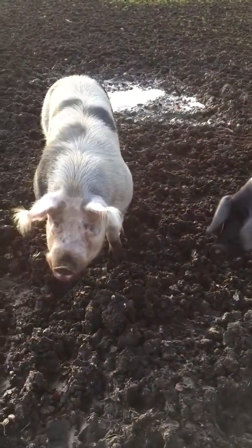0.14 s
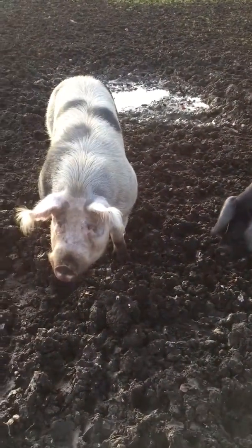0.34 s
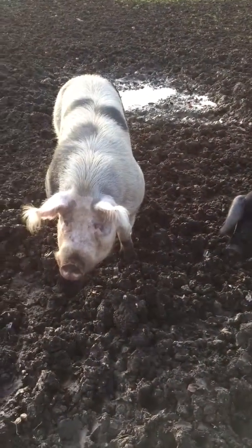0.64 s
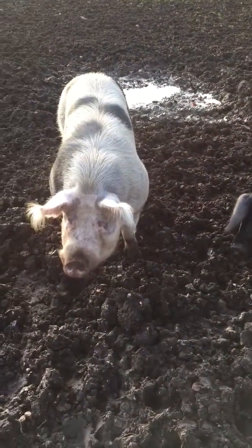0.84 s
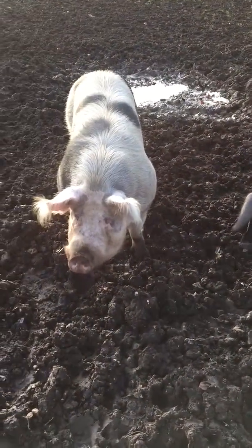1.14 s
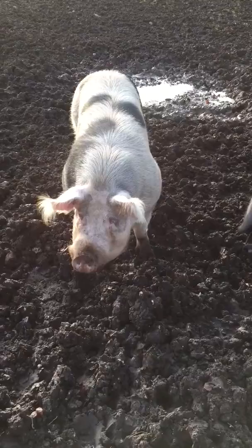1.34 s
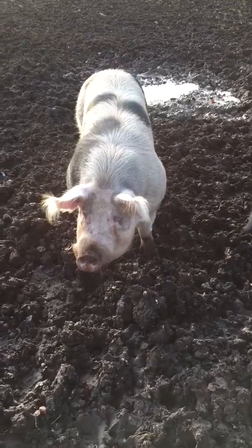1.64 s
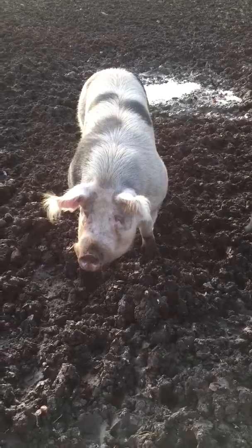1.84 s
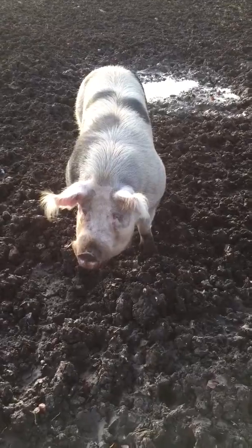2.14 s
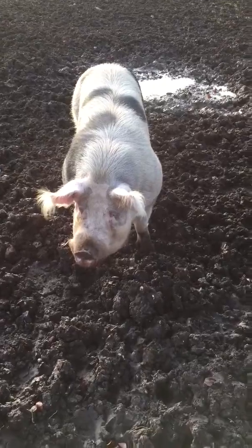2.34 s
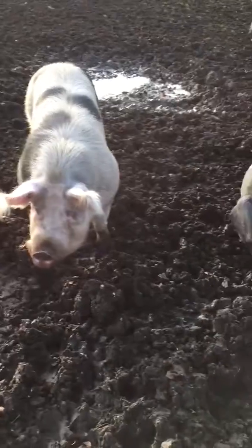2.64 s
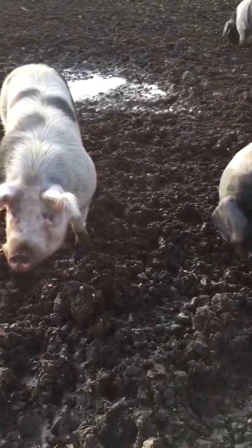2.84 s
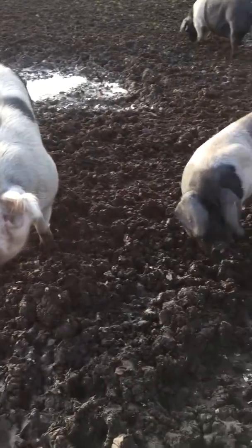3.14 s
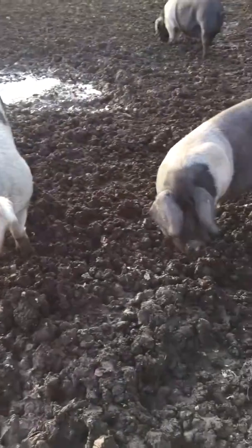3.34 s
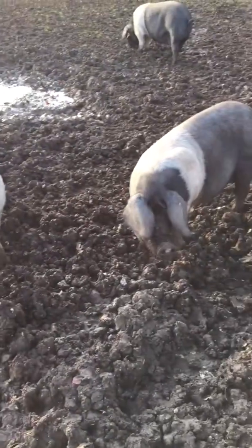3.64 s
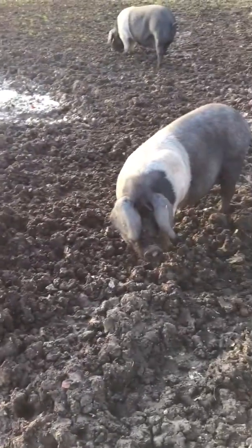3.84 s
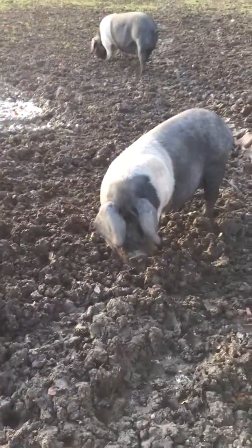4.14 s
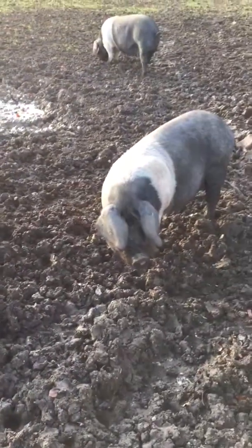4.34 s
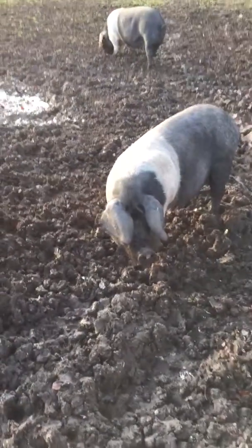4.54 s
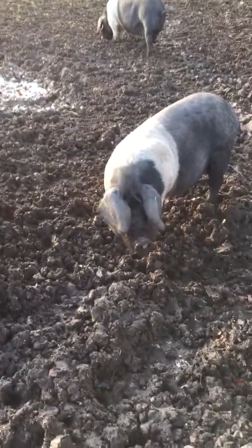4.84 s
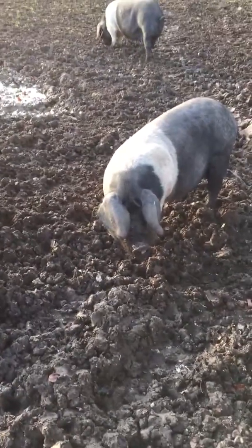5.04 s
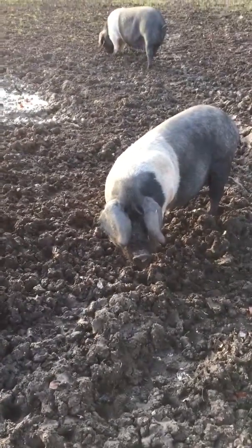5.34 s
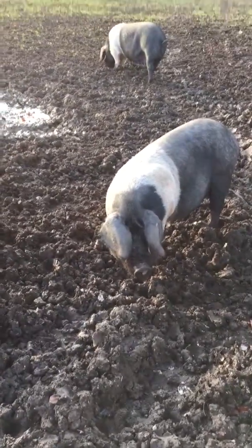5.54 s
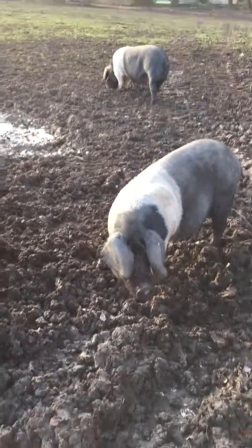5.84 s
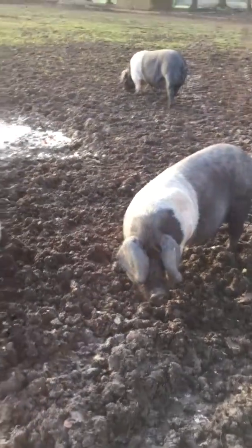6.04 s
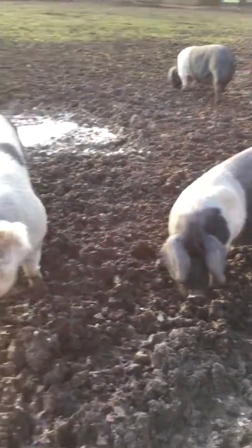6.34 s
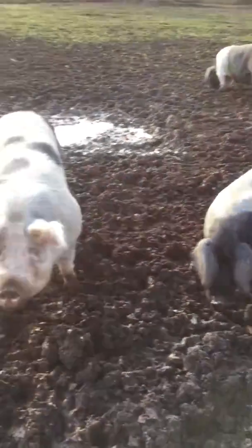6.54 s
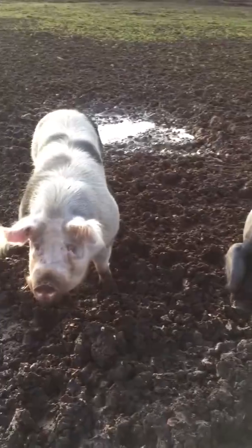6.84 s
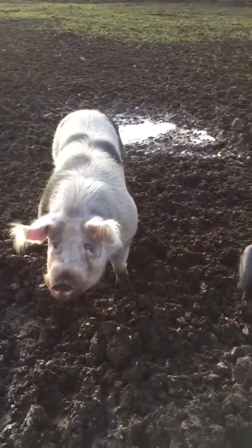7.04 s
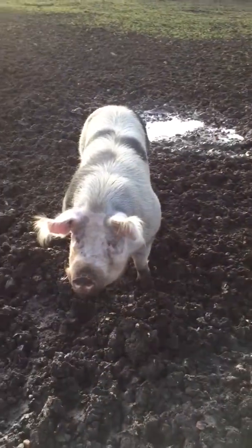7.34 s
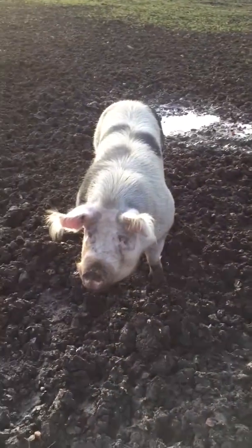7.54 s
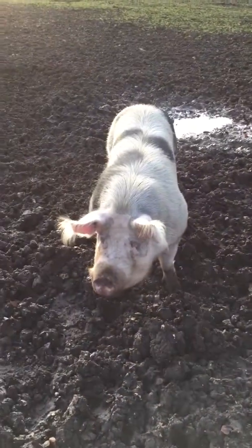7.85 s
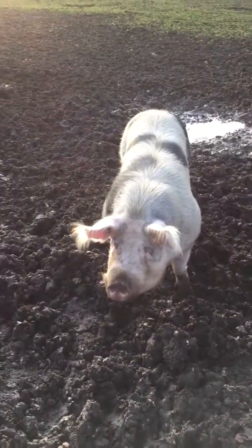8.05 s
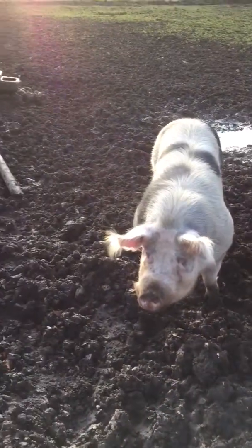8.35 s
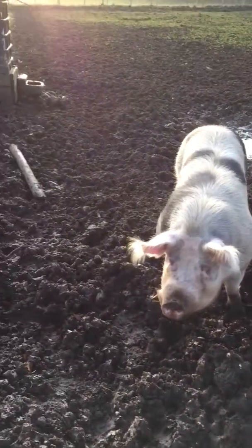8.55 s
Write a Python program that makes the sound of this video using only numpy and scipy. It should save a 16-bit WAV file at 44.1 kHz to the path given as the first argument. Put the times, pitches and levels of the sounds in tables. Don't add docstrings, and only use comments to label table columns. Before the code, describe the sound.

Pigs close by in a muddy paddock give fluttering, throaty grunts and sniffs, ending in gulps and a wet jaw smack over distant traffic.

```python
import sys
import numpy as np
from scipy import signal
from scipy.io import wavfile
from scipy.ndimage import uniform_filter1d

SR = 44100
rng = np.random.default_rng(int(sys.argv[2]) if len(sys.argv) > 2 else 0)


def pcm_store(signal):
    levels = np.round(np.clip(np.atleast_2d(signal), -1, 1) * 32767)
    wavfile.write(sys.argv[1], SR, levels.astype(np.int16).T)


def field_ratio(decibels):
    return 10 ** (np.asarray(decibels, dtype=float) / 20)


N = 384066


def rms_one(x):
    return x / np.sqrt(np.mean(x ** 2) + 1e-20)


def add(out, start_s, x):
    i = int(round(start_s * SR))
    out[i:i + len(x)] += x[:N - i]


def swell(start_s, length_s):
    return np.sin(np.pi * np.clip((np.arange(N) / SR - start_s) / length_s, 0, 1))


def eased(s, start_s, length_s):
    return np.sin(np.pi / 2 * np.clip((s - start_s) / length_s, 0, 1)) ** 2


def in_time(tables, rest=-120):
    t = np.arange(N) / SR
    columns = [[np.interp(t, r[:, 0], c, rest, rest) for c in r.T[1:]] for r in map(np.array, tables)]
    return np.max(columns, axis=0)


def drift(rate):
    knots = rng.standard_normal(int(N / SR * 40) + 2)
    return np.interp(np.arange(N) / SR * np.clip(rate, .1, 39), np.arange(len(knots)), knots)


def ring(seconds, modes):
    t = np.arange(int(seconds * SR)) / SR
    out = 0
    for k, (hz, width, db) in enumerate(modes):
        fade = np.exp(-np.pi * width * t)
        out = out + (-1) ** k * field_ratio(db) * fade * np.sin(2 * np.pi * hz * t)
    return out


def noise_through(response):
    return signal.fftconvolve(rng.standard_normal(N), response)[:N]


def coloured(spectrum, patchy_db):
    hz, db = np.transpose(spectrum)
    bands = int(3.3 * np.log2(hz[-1] / hz[0]))
    edges = np.geomspace(hz[0], min(hz[-1], .45 * SR), bands + 1)
    out, white = 0, rng.standard_normal((2, N))
    for k, (low, high) in enumerate(zip(edges, edges[1:])):
        band = signal.sosfilt(signal.butter(2, [low, high], "band", fs=SR, output="sos"), white[k % 2])
        level_db = np.interp(np.log(low * high) / 2, np.log(hz), db)
        out = out + band * field_ratio(level_db + patchy_db * drift(14))
    return rms_one(out)


def gliding_tone(length_s, from_hz, to_hz, soft_share):
    hz = np.linspace(from_hz, to_hz, int(length_s * SR))
    return np.sin(2 * np.pi * np.cumsum(hz) / SR) * signal.windows.tukey(len(hz), soft_share)


def soft_note(pitch_hz, t60_s):
    return np.convolve(ring(0.14, [(pitch_hz, 2.3 / t60_s, 0)]), np.hanning(40) / 20)


# pitch_hz [Hz], level_db [dB]
RUMBLE = [(18, -68), (30, -32), (67, -7.5), (81, 2.5), (97, 1.5), (114, -7), (162, -4.5), (212, -15),
          (282, -18.5), (420, -37), (550, -24), (920, -120)]
# pitch_hz [Hz], level_db [dB]
ROAR = [(180, -45), (300, -18), (411, -26.5), (854, 4), (1080, 2), (1630, -17), (2920, -27), (3280, -28.5),
        (3560, -20), (3810, -29), (9650, -35), (15900, -38.5)]
# start_s [s], length_s [s], engine_db, tyres_db [dB over the steady road]
PASSES = [
    (-0.5, 2.7, 0.5, 2.5),
    (3.5, 2.7, 5, 3.5),
    (5.0, 3, 1, 1.5),
    (7.5, 1.12, 3.5, 6),
    (7.5, 0.77, -3, 0),
]
# start_s [s], length_s [s], level_db [dB]
NEAR_CAR = (7.45, 0.8, -57.5)
# pitch_hz [Hz], width_hz [Hz], level_db [dB]
SPRAY = [(1380, 360, 0)]
RUMBLE_DB, ROAR_DB, DRONE_DB = -54.5, -57.5, -66.5
LORRY_S, LORRY_RISE_S, LORRY_DB = 7.4, 0.92, 17


def road():
    engine_db = sum(swell(start_s, length_s) ** 2 * engine for start_s, length_s, engine, _ in PASSES)
    tyres_db = sum(swell(start_s, length_s) ** 2 * tyres for start_s, length_s, _, tyres in PASSES)
    rumble = field_ratio(RUMBLE_DB + engine_db) * coloured(RUMBLE, patchy_db=4.5)
    roar = field_ratio(ROAR_DB + tyres_db) * coloured(ROAR, patchy_db=.5)
    hum = ring(.04, [(52, 70, 0)])
    drone_db = DRONE_DB + LORRY_DB * eased(np.arange(N) / SR, LORRY_S, LORRY_RISE_S)
    drone = field_ratio(drone_db) * rms_one(noise_through(np.convolve(hum, hum)))
    hiss = ring(.004, SPRAY)
    start_s, length_s, car_db = NEAR_CAR
    car = swell(start_s, length_s) ** 2 * field_ratio(car_db) * rms_one(noise_through(np.convolve(hiss, hiss)))
    return rumble + roar + drone + car


# start_s [s], length_s [s], from_hz [Hz], to_hz [Hz], level_db [dB]
BIRDS = [(0.75, 0.084, 2950, 2390, -74), (1.04, 0.036, 2950, 2600, -86.5), (1.105, 0.027, 3400, 3660, -77),
         (1.021, 0.13, 6900, 8700, -86), (1.053, 0.07, 2600, 3380, -81), (1.346, .13, 7200, 6560, -80.5),
         (1.548, 0.073, 6852, 6200, -75.5), (1.701, 0.06, 6550, 6000, -80), (7.279, 0.022, 2780, 2700, -69),
         (7.775, 0.14, 3570, 3440, -77.5), (7.908, 0.06, 3460, 3130, -77), (8.22, 0.037, 2700, 2760, -71),
         (8.223, 0.017, 3410, 3440, -75)]


def birds():
    out = np.zeros(N)
    for start_s, length_s, from_hz, to_hz, db in BIRDS:
        add(out, start_s, np.sqrt(2) * field_ratio(db) * gliding_tone(length_s, from_hz, to_hz, .4))
    blur = uniform_filter1d(rng.standard_normal(N), size=300)
    return out * (.9 + .3 * rms_one(blur))


# start_s [s], length_s [s], level_db [dB]
FAR_GRUNT = (-0.15, .45, -57.5)
# pitch_hz [Hz], width_hz [Hz], level_db [dB]
FAR_THROAT = [(440, 780, 0)]
# start_s [s], peak_db [dB], pitch_hz [Hz], t60_s [s]
MUTTERS = [
    (7.299, -53, 273, 0.27),
    (7.509, -44, 602, 0.076),
    (8.267, -43.5, 413, 0.068),
    (8.33, -42.5, 358, 0.093),
    (8.348, -35, 187, 0.039),
]


def far_pigs():
    start_s, length_s, level_db = FAR_GRUNT
    out = swell(start_s, length_s) * field_ratio(level_db) * rms_one(noise_through(ring(.01, FAR_THROAT)))
    for start_s, db, hz, t60_s in MUTTERS:
        add(out, start_s, field_ratio(db) * soft_note(hz, t60_s))
    return out


# [7-15 kHz, dB over the peak]
TICKS = [(0.7368, -58.5, 2670, -0.5), (1.118, -61, 3550, -17), (1.5894, -64, 6370, -13),
         (1.972, -51, 3280, -30), (2.014, -58, 3440, -30), (2.571, -63, 7000, -5), (2.611, -68, 9000, -3),
         (3.4244, -57, 2500, -4), (3.52, -55.5, 3240, -23), (3.6363, -39.5, 2860, -15),
         (3.6414, -69, 3300, -27), (3.854, -51.5, 9500, -28), (3.8614, -73, 2380, 2),
         (4.2722, -65, 2480, 5), (6.918, -62, 2900, -25), (6.92, -57, 3600, -25), (6.938, -53, 2870, -24),
         (6.243, -52, 8000, -2), (7.1895, -69, 2410, -16), (7.3204, -57, 2300, -22), (7.97, -30, 2630, -28),
         (8.008, -46.5, 2600, -28), (8.237, -49.5, 2720, -25)]


def ticks():
    out, t = np.zeros(N), np.arange(int(0.054 * SR)) / SR
    for start_s, db, hz, edge_db in TICKS:
        burst = rng.standard_normal(len(t)) * field_ratio(-60 * t / 0.057)
        body = signal.fftconvolve(burst, ring(.005, [(hz, hz * 0.32, 0)]))[:len(t)]
        edge = signal.sosfilt(signal.butter(4, 6500, "high", fs=SR, output="sos"), burst)
        add(out, start_s, field_ratio(db) * (body / abs(body).max() + field_ratio(edge_db) * edge / abs(edge).max()))
    return out


# start_s [s], peak_db [dB]
SMACK = [
    (7.9712, -17.5),
    (7.9775, -18),
    (7.9825, -13.5),
]
# pitch_hz [Hz], level_db [dB], t60_s [s]
JAW = [(237, -12.5, 0.03), (664, -1, 0.013), (955, -5.5, 0.014), (1280, -15, 0.031), (1680, -16.5, 0.032),
       (2670, -11, 0.015), (4840, -11.5, 0.0028), (6370, -18.5, 0.017)]


def smack():
    out = np.zeros(N)
    for k, (start_s, db) in enumerate(SMACK):
        modes = [(hz, 2.5 / t60_s, level_db - k * 14 * np.log2(hz / 220)) for hz, level_db, t60_s in JAW]
        add(out, start_s, field_ratio(db) * ring(.05, modes))
    return out


# start_s [s], level_db [dB]
SNORT = [
    (2.43, -79),
    (2.482, -53.5),
    (2.54, -74),
]
# pitch_hz [Hz], width_hz [Hz], level_db [dB]
SNORT_MODES = [(2480, 125, 4), (2890, 240, -2.5), (3300, 61, -12), (4100, 340, 4), (5550, 250, -12),
               (8150, 350, -17.5), (11200, 180, -19), (12800, 250, -9), (14700, 250, -24)]
FLUTTER_HZ = 75


def snort():
    gate = np.cos(np.pi * FLUTTER_HZ * (np.arange(N) / SR - 2.479)) ** 6 + 0.16
    air = signal.fftconvolve(gate * rng.standard_normal(N), ring(.02, SNORT_MODES))[:N]
    return field_ratio(in_time([SNORT])[0] + 13.5) * rms_one(air)


# start_s [s], length_s [s], from_hz [Hz], to_hz [Hz], level_db [dB]
WHISTLES = [(6.25, .2, 3580, 3330, -59), (6.52, .08, 3150, 3090, -63), (6.375, .07, 9400, 9300, -73),
            (6.36, .07, 5600, 5700, -70), (2.59, .045, 5960, 5940, -67), (2.625, .03, 5500, 5480, -69),
            (2.418, .035, 5650, 5600, -65), (2.76, .07, 3150, 3150, -68), (6.79, .11, 3120, 3100, -66),
            (2.3, .1, 4750, 4600, -70), (2.16, .05, 6250, 6200, -71), (7.01, .03, 2480, 2500, -63),
            (6.94, .04, 2850, 2900, -62), (6.55, .12, 2200, 2130, -60), (6.84, .14, 4620, 4600, -71)]


def whistles():
    out = np.zeros(N)
    for start_s, length_s, from_hz, to_hz, db in WHISTLES:
        add(out, start_s, field_ratio(db) * gliding_tone(length_s, from_hz, to_hz, .5))
    waver = uniform_filter1d(uniform_filter1d(rng.standard_normal(N), size=150), size=150)
    return out * (.6 + .8 * rms_one(waver))


# start_s [s], length_s [s], nostril_db [dB], jet_db [dB]
SNIFFS = [(-.1, 0.27, -64, -72.5), (0.779, 0.055, -78, -78), (3.93, 0.28, -70.5, -74),
          (6.147, 0.18, -59.5, -90), (6.28, 0.25, -62, -74), (6.42, 0.13, -80, -68.5),
          (6.612, 0.14, -57, -76), (6.91, 0.095, -56.5, -90), (6.991, 0.14, -57.5, -75.5),
          (7.12, 0.11, -62.5, -73), (7.323, 0.23, -53, -64.5), (7.458, 0.028, -51.5, -63),
          (7.553, 0.12, -62.5, -61.5), (7.766, 0.061, -69, -68.5), (7.954, 0.035, -48.5, -73),
          (8.491, 0.086, -61.5, -72)]
# pitch_hz [Hz], width_hz [Hz], level_db [dB]
NOSTRILS = [(1460, 340, 9), (2180, 250, 4), (2860, 1160, 11.5), (4250, 1100, -0.5)]
# pitch_hz [Hz], level_db [dB per Hz]
JET = [(2940, -47), (5000, -10.5), (5870, -1), (6620, -14.5), (8600, -4.5), (10400, -13), (13900, -10),
       (15900, -18)]
# start_s [s], length_s [s], level_db [dB]
INTAKE = (6.13, 0.16, -63)
# pitch_hz [Hz], level_db [dB]
INTAKE_AIR = [(3000, -10), (4500, 0), (6000, 3), (7500, -8), (9200, -1), (10500, -14), (15000, -17)]
# start_s [s], length_s [s], level_db [dB]
SIGHS = [
    (-.3, 0.93, -69),
    (1.84, 0.88, -64),
    (2.7, 0.32, -70.5),
    (3.05, 0.55, -73),
    (5.42, 0.41, -71.5),
    (6.2, 0.62, -73),
    (8.0, 0.67, -70),
]
# pitch_hz [Hz], width_hz [Hz], level_db [dB]
SNOUT = [(2090, 89, -5), (3300, 1030, 1.5), (4290, 600, 1), (5820, 520, -7), (7030, 180, -16)]


def sniffs():
    nose = noise_through(ring(0.021, NOSTRILS))
    nose = rms_one(signal.sosfilt(signal.butter(6, 4600, fs=SR, output="sos"), nose)) * field_ratio(2.2 * drift(39))
    jet = coloured(JET, patchy_db=6.0)
    out = np.zeros(N)
    for start_s, length_s, nostril_db, jet_db in SNIFFS:
        out += swell(start_s, length_s) ** 1.05 * (field_ratio(nostril_db) * nose + field_ratio(jet_db) * jet)
    start_s, length_s, level_db = INTAKE
    out += swell(start_s, length_s) * field_ratio(level_db) * coloured(INTAKE_AIR, patchy_db=1.0)
    sigh = sum(swell(start_s, length_s) * field_ratio(db) for start_s, length_s, db in SIGHS)
    return out + sigh * rms_one(noise_through(ring(0.021, SNOUT)))


# start_s [s], peak_db [dB], pitch_hz [Hz], t60_s [s]
GULPS = [
    (7.066, -29, 830, 0.06),
    (7.097, -25.5, 886, 0.043),
    (7.097, -34.5, 990, 0.05),
]


def gulps():
    out = np.zeros(N)
    for start_s, db, hz, t60_s in GULPS:
        add(out, start_s, field_ratio(db) * soft_note(hz, t60_s))
    return out


# pitch_hz [Hz], width_hz [Hz], level_db [dB]
CHEST = [(67.4, 23.7, 0.5), (86, 14.3, -7)]
# pitch_hz [Hz], width_hz [Hz], level_db [dB]
WINDPIPE = [(124, 24.4, -7.5), (192.3, 43.2, -0.5)]
# start_s [s], level_db [dB]
CHEST_SHARE = [(1.9, -4), (2.1, 5), (2.5, 2.5), (2.85, -1.5), (4.4, -3), (5.55, -0.5), (6.3, 1),
               (6.6, -1.5), (6.8, -4), (6.95, 0), (7.1, -5)]
# start_s [s], length_s [s], times as unsteady
BREAK_UP = (6.88, .2, 7)
WOBBLE_S, WOBBLE_DB, WOBBLE_PITCH = .0006, 1.0, .025


def thump(s, lag_s, chance):
    start_s, length_s, times = BREAK_UP
    unsteady = 1 + times * swell(start_s, length_s)[int(s * SR)]
    spreads = [WOBBLE_S * unsteady, WOBBLE_PITCH, WOBBLE_DB, WOBBLE_DB * np.sqrt(unsteady)]
    late, pitch, pipe_db, chest_db = chance * spreads
    share_db = np.interp(s, *np.transpose(CHEST_SHARE)) + chest_db
    chest = [(hz * (1 - pitch), width, db) for hz, width, db in CHEST]
    pipe = [(hz * (1 + pitch), width / unsteady ** .4, db) for hz, width, db in WINDPIPE]
    out = field_ratio(share_db) * ring(.15, chest)
    add(out, max(lag_s + late, 0), field_ratio(pipe_db) * ring(.11, pipe))
    return out


# from_hz [Hz], to_hz [Hz], width_hz [Hz], from_db [dB], to_db [dB]
BARK_TONGUE = [(270, 240, 23, 5, 18), (628, 670, 69, 20.5, 17), (1075, 1020, 46, 8, 1),
               (1334, 1330, 18, 3, 3), (1770, 1660, 59, 12, 7), (1990, 1900, 61, 17.5, -23),
               (3300, 3140, 100, -14, 12), (3720, 3650, 150, -23, 2.5)]
BARK_LIPS = [(2700, 2400, 110, 2, -2)]
EARLY_TONGUE = [(576, 588, 106, 13, 16.5), (1040, 804, 43, 11, 15), (1348, 950, 21, 9, 1),
                (1800, 1550, 140, -16, 10.5), (3127, 2800, 114, 11.5, -15), (3710, 3090, 45, -7, -3)]
LONG_LIPS = [(2226, 1775, 68, 10.5, 15), (4300, 4167, 86, 1, 3), (4660, 4550, 134, -4, -9),
             (7300, 9100, 180, -32, -30)]
FIRST_LIPS = [(447, 471, 67, 3, 13), (766, 781, 76, -3, 19.5), (1330, 1376, 36, -4, 11),
              (3720, 3720, 43, -9, -3), (3080, 3400, 65, -30, -5), (5300, 5080, 100, -26, -0.5)]
SOFT_TONGUE = [(384, 395, 103, 19, 11.5), (925, 906, 23, 5.9, 7.1), (1350, 1120, 54, 5.6, 1.8)]
SOFT_LIPS = [(2420, 2500, 74, -36, -10), (3300, 3300, 60, -33, -13.5)]
GRUFF_TONGUE = [(292, 255, 73, 17.5, 25.5), (625, 560, 202, 29, 27.5), (1720, 1280, 34, 7, 18.5),
                (2380, 2380, 140, -3, 11), (3240, 3020, 72, -6, 6), (3700, 3400, 160, -5, -7.5),
                (2000, 2300, 130, -12, 4)]
GRUFF_LIPS = [(980, 1036, 68, 13, 18.3)]
LATE_TONGUE = [(1330, 966, 23, 12, 6.3)]
LAST_LIPS = [(462, 464, 31.6, 5, 6.5), (1660, 1530, 180, 8, 13), (2170, 1796, 79, 11.5, 14),
             (4315, 4160, 87, 4.5, 4.5), (4710, 4620, 83, -4.5, 1), (5770, 5620, 74, -14, -8)]
LATE_JAW = [(1390, 1480, 85, 3, 8.5), (2430, 2280, 61, 7.5, -17), (3530, 3120, 41, 3.5, -5)]
VOICES = [(BARK_TONGUE, BARK_LIPS), (EARLY_TONGUE, LONG_LIPS + FIRST_LIPS), (SOFT_TONGUE, SOFT_LIPS),
          (GRUFF_TONGUE, GRUFF_LIPS),
          (LATE_TONGUE, LAST_LIPS, LATE_JAW, [(628, 610, 88, 17, 2), (990, 774, 19, 10.4, 5)])]
DULLING = 0.19


def tract_at(s, moves, voice, mouth_db):
    modes = []
    for move, rows in zip(moves, voice):
        p = eased(s, *move)
        for from_hz, to_hz, width, from_db, to_db in rows:
            modes.append((from_hz + p * (to_hz - from_hz), width, from_db + p * (to_db - from_db)))
    return [(hz, width, db + mouth_db * (1 + DULLING * np.log2(hz / 500))) for hz, width, db in sorted(modes)]


# pitch_hz [Hz], width_hz [Hz], level_db [dB]
TURBINATES = [(5710, 200, 0), (6160, 160, -16), (7200, 120, -9.5), (8440, 200, -0.5), (9220, 210, 3.5),
              (11550, 150, -3.5), (12500, 300, 0), (13600, 370, 3)]
CRACKLES_PER_S, CRACKLE_DB = 45, -4


def rasp(puffs, rasp_db):
    narrow = signal.fftconvolve(rng.standard_normal(N) * field_ratio(7.2 * drift(39)), ring(.01, TURBINATES))[:N]
    air = .75 * coloured(JET, patchy_db=5.0) + .5 * rms_one(narrow)
    bursts = (rng.random(N) < CRACKLES_PER_S / SR) * rng.exponential(1, N)
    crackle = field_ratio(CRACKLE_DB) * np.convolve(bursts, np.hanning(130), "same")
    return (puffs + crackle) * field_ratio(rasp_db + 6.5) * air


OPEN_RISE, LEAK_TOP_HZ = 0.033, 2600


def leak(t, tract, detune):
    air = signal.lfilter([1], [1, -.55], rng.standard_normal(len(t)))
    air = air * np.sin(np.pi * np.clip(t / .034, 0, 1))
    rise = 1 + OPEN_RISE * (1 + detune)
    damped = np.interp(t * rise, t, tract) * np.exp(-t / .006)
    whisper = signal.fftconvolve(rms_one(air) / np.sqrt(len(t)), damped)
    return signal.lfilter(*signal.butter(1, LEAK_TOP_HZ, fs=SR), whisper)


def flap_times(rows):
    s, rate = np.transpose(rows)
    t = np.arange(s[0], s[-1] + .01, 1 / SR)
    turns = np.cumsum(np.interp(t, s, rate)) / SR
    return np.interp(np.arange(int(turns[-1]) + 1), turns, t)


# start_s [s], rate [flaps per s]
FLAP_RATE = [
    [(1.8405, 38.4), (1.8663, 39.17), (1.9252, 28.8)],
    [(1.973, 23.48), (2.1274, 30.57), (2.5952, 29.26), (2.6037, 28.05), (2.7572, 30.11), (2.8337, 25.47)],
    [(4.3397, 29.04), (4.4315, 26.79), (4.5232, 23.1), (4.615, 23.66)],
    [(5.4509, 34.17), (5.5274, 31.73), (5.604, 33.07)],
    [(6.1534, 22.15), (6.2698, 28.61), (6.4043, 26.57), (6.473, 28.9), (6.6126, 25.8), (6.7784, 24.93),
     (7.0982, 34.01)],
]
# start_s [s], chest_db, mouth_db (opening), rasp_db [dB]
SHORT_EFFORT = [
    [(1.84, -46, -22, -87), (1.866, -40, 1, -83), (1.92, -39.5, 1.5, -70), (1.96, -35, -16, -90)],
    [(4.32, -54, -11.5, -90), (4.46, -44, 1, -93), (4.64, -58, -12, -96)],
    [(5.43, -47.5, -16, -98), (5.485, -42, -5.5, -96), (5.55, -38.5, 2, -96), (5.58, -37, -0.5, -95),
     (5.61, -38, -12, -98), (5.64, -42, -20, -97)],
]
# start_s [s], chest_db, mouth_db (opening), rasp_db [dB]
LONG_EFFORT = [
    [(1.96, -47, -17, -81), (2.02, -44, -9.5, -83), (2.05, -41, -3.5, -75), (2.15, -37.5, -4, -70),
     (2.42, -35.5, -2, -78), (2.49, -35.5, -2, -68.5), (2.65, -31.5, -1.5, -68.5), (2.8, -34.5, -6, -78),
     (2.87, -43, -25, -80)],
    [(6.14, -51, -19.5, -71), (6.25, -37, -5.5, -72), (6.39, -32.5, -0.5, -71), (6.52, -33.5, 0.5, -67.5),
     (6.65, -35, -3, -80), (6.87, -35.5, -3, -72), (7.01, -40.5, -14, -105), (7.085, -40, -11.5, -79),
     (7.13, -26, 2, -71)],
]
# start_s [s], length_s [s]
MOVES = [
    [(1.853, 0.06), (1.88, 0.059)],
    [(2.02, 0.34), (2.35, 0.15)],
    [(4.3, 0.34), (4.3, 0.24)],
    [(5.444, 0.086), (5.5, 0.063)],
    [(6.15, 0.415), (6.56, 0.22), (6.33, 0.25), (6.2, 0.498)],
]
# start_s [s], length_s [s], swing_db [dB on odd flaps]
SWINGS = [
    (2.74, 0.071, -2),
    (2.147, 0.3, 3.5),
    (6.2, 0.11, -9),
]
LEAK_DB = [-22, -15, -13, -20, -16]
GLIDES = [0.0084, 0.028, 0.006, 0.0062, 0.035]
CHEST_LAG_S = [.006, .0042, .006, .003, .004]
GLIDE_S, GLIDE_TOP_HZ = 0.0085, 2380
SHUT_S, LEFT, RAGGED_DB = .011, .36, -24.5
SNAP, SNAP_S = 1.5, .0014
SINUS_HZ, SINUS_Q = 2780, 11


def grunts():
    mouth, thumps, puffs = np.zeros(N), np.zeros(N), np.zeros(N)
    chest_db, mouth_db, rasp_db = in_time(SHORT_EFFORT + LONG_EFFORT)
    swing = sum(db * swell(start_s, length_s) for start_s, length_s, db in SWINGS)
    t = np.arange(int(.06 * SR)) / SR
    closing = 1 - np.exp(-(t / .0027) ** 2)
    opening = LEFT + (1 - LEFT) * np.exp(-(t / SHUT_S) ** 4)
    for rows, leak_db, moves, voice, glide, lag_s in zip(FLAP_RATE, LEAK_DB, MOVES, VOICES, GLIDES, CHEST_LAG_S):
        bent = np.cumsum(1 + glide * np.tanh(t / GLIDE_S - 1)) / SR
        for k, s in enumerate(flap_times(rows)):
            now = int(s * SR)
            uneven, detune = rng.normal(0, 1, (2, 22))
            modes = []
            for (hz, width, db), u, d in zip(tract_at(s, moves, voice, mouth_db[now]), uneven, detune):
                modes.append((hz * (1 + hz / 2e5 * d), width, db + min(.5 + hz / 1300, 3.5) * u))
            low = ring(.06, [(hz, width, db - 200 * (hz > GLIDE_TOP_HZ)) for hz, width, db in modes])
            tract = (ring(.06, modes) - low + np.interp(bent, t, low)) * closing
            splash = rng.standard_normal(len(t)) * closing * np.exp(-t / 0.0073)
            blurred = ring(.004, [(hz, 4 * width, db - 6 * (hz < 1200)) for hz, width, db in modes])
            ragged = signal.fftconvolve(splash, blurred)[:len(t)]
            swing_db = swing[now] * (-1) ** (k + 1)
            add(mouth, s - .001, (tract * opening + field_ratio(RAGGED_DB) * ragged) * field_ratio(swing_db - 39.5))
            add(mouth, s - .0015, leak(t, tract, detune[-1]) * field_ratio(leak_db + 5 - 39))
            puff = closing * np.exp(-t / .004) + .2 * np.sin(np.pi * t / .06)
            add(puffs, s - .001, field_ratio(swing_db + 2.5 * uneven[0]) * puff)
            add(puffs, s + 0.0012, field_ratio(swing_db + 3.6 * uneven[1]) * SNAP * np.exp(-t / SNAP_S))
            add(thumps, s - .0065, field_ratio(chest_db[now] + 8) * thump(s, lag_s, uneven[-4:]))
    body = signal.sosfilt(signal.butter(4, 295, fs=SR, output="sos"), thumps)
    mouth = signal.sosfilt(signal.butter(3, 370, "high", fs=SR, output="sos"), mouth)
    mouth = signal.lfilter(*signal.iirnotch(SINUS_HZ, SINUS_Q, SR), mouth)
    return mouth + body + rasp(puffs, rasp_db)


def scene():
    far = road() + birds() + far_pigs()
    near = ticks() + smack() + snort() + whistles() + sniffs() + gulps() + grunts()
    return (far + near)[None]


def low_pass(x):
    return signal.sosfilt(signal.butter(12, 16040, fs=SR, output="sos"), x)


def record(dry):
    mix = signal.sosfilt(signal.butter(6, 42, "high", fs=SR, output="sos"), dry)
    return low_pass(mix)


dry = scene()
out = record(dry)
pcm_store(out)
```